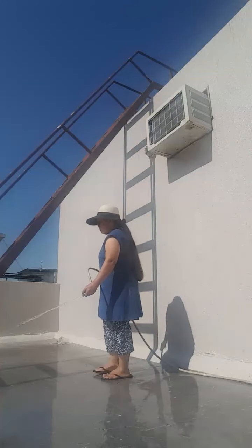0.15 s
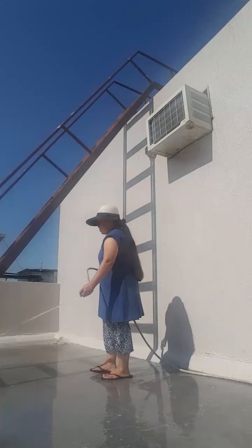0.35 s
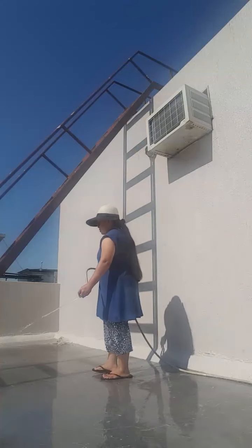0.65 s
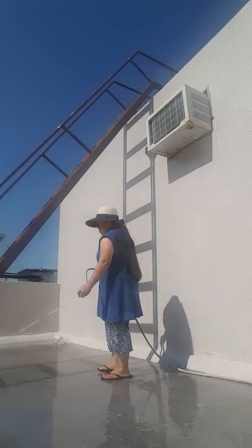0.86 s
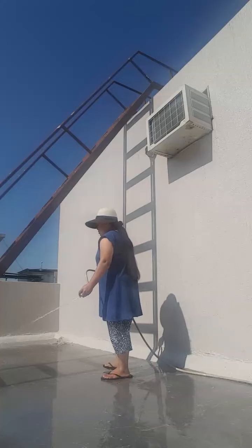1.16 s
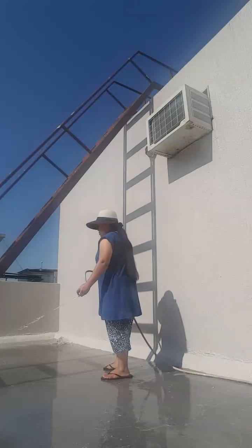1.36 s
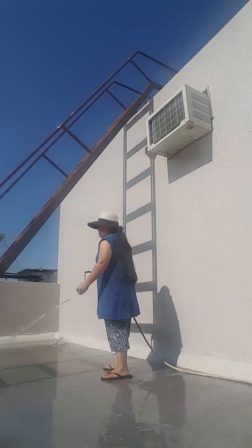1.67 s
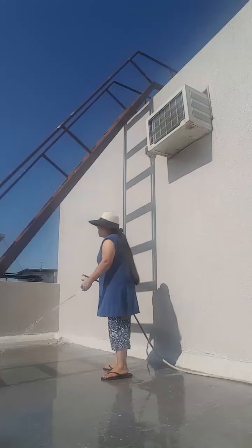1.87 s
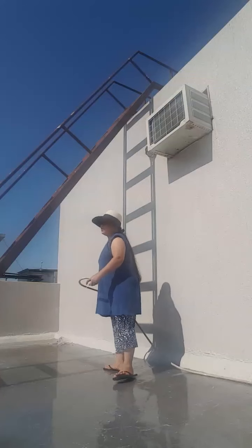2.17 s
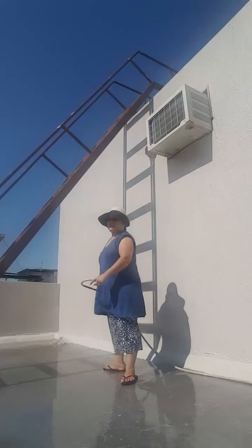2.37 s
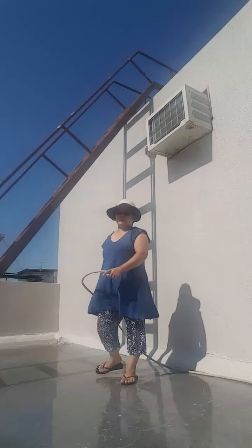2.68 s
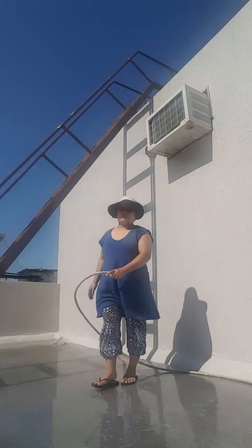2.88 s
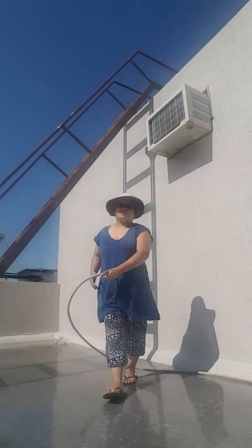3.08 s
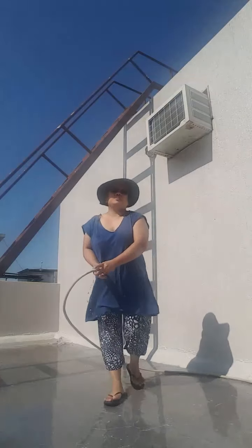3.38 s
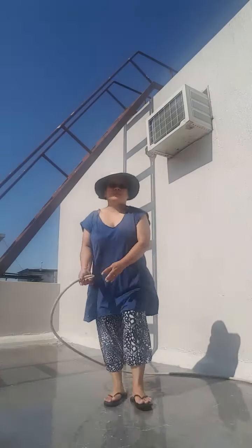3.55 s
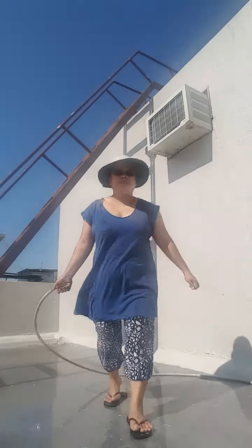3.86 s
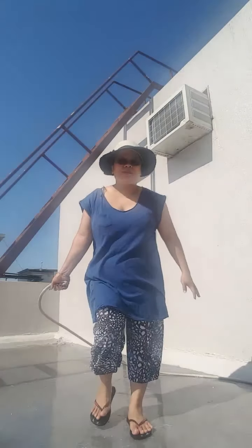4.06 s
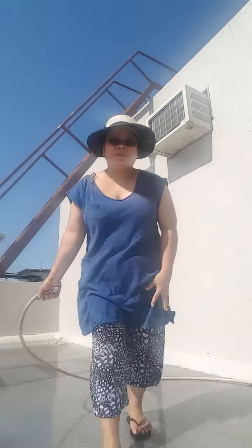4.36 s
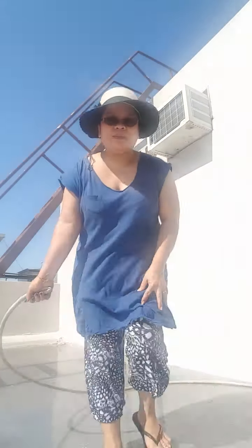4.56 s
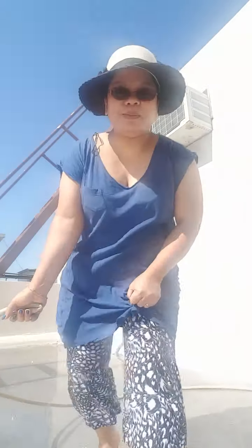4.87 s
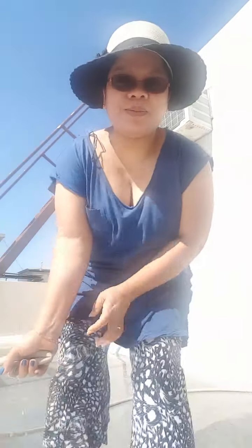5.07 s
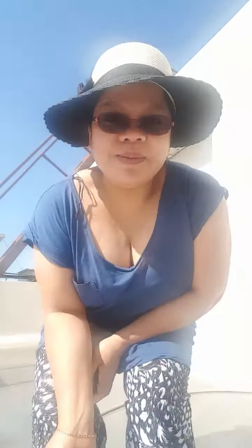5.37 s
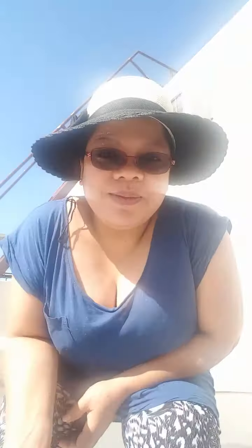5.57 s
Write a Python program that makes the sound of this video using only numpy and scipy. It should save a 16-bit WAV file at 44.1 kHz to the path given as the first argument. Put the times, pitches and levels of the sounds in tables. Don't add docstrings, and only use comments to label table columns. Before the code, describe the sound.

On an open concrete roof terrace, a hose sprays the floor with bright, fizzing splatter for about two seconds, then cuts off to a few drips. A steady low compressor hum and fan roar continue throughout. Sparrows chirp with hard wall echoes. Wet sandals smack, knock and scuff irregularly, approaching a phone microphone, with small ticks and a long scrape near the end. Soft wind bumps hit the microphone early on.

```python
import sys
import numpy as np
from scipy import signal
from scipy.fft import rfft, irfft, next_fast_len
from scipy.io import wavfile
from scipy.ndimage import uniform_filter1d

SR = 44100
rng = np.random.default_rng(int(sys.argv[2]) if len(sys.argv) > 2 else 0)


def generate_wav(signal):
    frames = np.transpose(np.atleast_2d(signal))
    scaled = np.clip(frames, -1, 1) * 32767
    pcm = np.round(scaled).astype(np.int16)
    wavfile.write(sys.argv[1], SR, pcm)


def invert_db(x):
    u = np.asarray(x, float) / 20
    return 10 ** u


N = 252693

# time in seconds, level in dB.
SPRAY_LEVEL = [
    (0, -33.5),
    (.2, -37.5),
    (.8, -36.5),
    (1.15, -38.5),
    (1.55, -36.5),
    (1.98, -37.5),
    (2.14, -44),
    (2.2, -53.5),
    (2.5, -80),
]
# frequency in Hz, level in dB per Hz.
SPLASH_TONE = [(880, -27.5), (1500, -7), (1640, -9), (2090, -3.5), (2610, -13), (3050, -7), (3600, -13),
               (4550, -7.5), (5800, -8.5), (6520, -6.5), (7180, -10), (8390, -5), (10600, -13),
               (12900, -11.5), (15300, -21.5)]
# frequency in Hz, width in Hz, change in dB.
FLOOR_DIPS = [(11980, 160, -9), (13200, 180, -8)]
# start in seconds, peak in dB.
BIG_DROPS = [(0.026, -22), (0.178, -19), (0.228, -27), (0.5287, -23), (0.5716, -20), (0.6642, -24),
             (0.7365, -15), (0.9592, -24.5), (1.1233, -20.5), (1.268, -20.5), (1.331, -18), (1.369, -18.5),
             (1.5424, -20), (1.8282, -28), (2.076, -23.5)]
# start in seconds, peak in dB.
DRIPS = [
    (2.253, -53),
    (2.268, -49),
    (2.400, -52),
    (2.449, -56),
    (2.468, -51),
    (2.496, -52),
    (2.535, -47),
    (2.552, -56),
    (3.19, -55),
    (4.155, -45.5),
]
# start in seconds, peak in dB.
STRAP_TICKS = [
    (3.700, -37.5),
    (3.750, -48),
    (3.834, -32.5),
    (4.210, -35),
    (4.717, -42),
    (4.740, -43.5),
    (4.765, -47),
]
# start in seconds, peak in dB, centre in Hz, length in ms.
SOLE_SLAPS = [(3.142, -42, 11000, 1.6), (3.150, -37.5, 5860, 1.7), (3.582, -35, 10000, 2.3),
              (3.624, -40, 9100, 1.2), (3.643, -41, 3000, 3.3), (3.792, -45, 8000, 5.7),
              (3.826, -45, 10900, 3.5), (3.955, -37.5, 1900, 4), (4.219, -45.5, 5000, 4.5),
              (4.323, -52.5, 6000, 2.5), (4.473, -48.5, 5000, 2.5), (4.705, -47, 4000, 1.5),
              (4.760, -38, 3000, 1.3), (4.835, -39.5, 2950, 2.5), (4.925, -47.5, 7000, 3),
              (5.121, -51, 4000, 2), (5.180, -43, 7000, 4.5), (5.188, -50, 9000, 3), (4.711, -49, 7000, 2),
              (4.772, -49, 5500, 2)]
# start in seconds, peak in dB, centre in Hz, length in ms.
HEEL_KNOCKS = [
    (3.612, -34, 3350, 2.9),
    (3.614, -39, 1900, 2.5),
    (3.819, -35.5, 3400, 1.6),
    (4.208, -33, 2160, 3.8),
    (4.584, -45, 2700, 3.6),
    (4.72, -33.5, 2830, 4),
    (4.733, -48.5, 2800, 2.2),
    (4.742, -47.5, 1800, 1.5),
    (4.751, -36.5, 1920, 3.2),
    (5.429, -32, 2050, 2.6),
]
# start in seconds, length in seconds, level in dB,
# centre in Hz, spread in octaves.
SCUFFS = [
    (3.232, .095, -50.5, 14500, .5),
    (3.234, 0.069, -45, 5970, 1.1),
    (3.579, 0.068, -51.5, 10900, 1.2),
    (4.702, .03, -46.5, 2780, 0.44),
    (4.704, 0.072, -51, 4500, 1.0),
    (5.199, 0.23, -48, 1500, 0.31),
    (4.92, .05, -63, 12900, .5),
    (5.13, 0.15, -56, 5500, 0.41),
    (5.241, .07, -53, 5950, 0.28),
    (5.624, .11, -64, 14500, .2),
]
# time in seconds, pitch in Hz, level in dB.
SQUEAK = [
    (5.12, 15160, -80),
    (5.14, 15200, -68),
    (5.2, 14300, -71),
    (5.225, 15250, -68.5),
    (5.3, 15400, -66),
    (5.335, 14900, -65.5),
    (5.4, 13400, -74),
]
# share of its length, pitch in Hz, level in dB.
FALLING_SHAPE = [(0, 4760, -8.5), (.11, 5096, -0.5), (.24, 5005, -7), (.37, 4710, -6), (.72, 4060, 0),
                 (.87, 4010, -5.5), (1, 3330, -6)]
# start in seconds, length in seconds, level in dB,
# upward flick before the last drop in Hz, flutter from 0 to 1.
FALLING_CHIRPS = [
    (1.688, .066, -39.5, -80, 0.9),
    (2.129, .06, -39.5, 600, 0.6),
    (2.677, 0.049, -40.5, -150, 0.2),
    (3.345, .059, -38, 750, 0.16),
    (4.050, 0.062, -37, 700, 0.2),
    (5.574, .054, -35, 650, .3),
]
# start in seconds, length in seconds, level in dB,
# starting pitch in Hz, top pitch in Hz.
ARCHED_CHIRPS = [
    (1.756, .032, -39.5, 3500, 3750),
    (2.182, 0.04, -38, 3340, 3850),
    (2.744, .042, -38, 3600, 4130),
    (3.400, .047, -38.5, 3010, 3820),
    (4.104, .044, -38, 2960, 3760),
    (5.626, .044, -37.5, 3130, 3810),
    (2.716, .035, -48, 4830, 5280),
    (3.171, 0.077, -45, 3470, 3540),
    (5.668, .056, -48, 4550, 4500),
]
# start in seconds, length in seconds, level in dB,
# starting pitch in Hz, top pitch in Hz.
PEEPS = [
    (2.003, .045, -48, 2750, 3030),
    (2.062, .028, -50, 2930, 3100),
    (5.470, .075, -55, 3000, 3250),
    (2.782, .018, -46, 4150, 4300),
    (2.719, .024, -41, 3500, 3700),
    (3.350, .022, -50, 5750, 5950),
    (4.056, .022, -56, 5750, 5950),
    (5.577, .022, -54, 5500, 5900),
    (2.738, .018, -56, 5850, 6000),
]
# delay in seconds, level in dB.
WALL_ECHOES = [
    (.007, -7.5),
    (0.032, -17.5),
    (.058, -21),
    (.099, -18.5),
]
# time in seconds, level at the stroke rate in dB, level at twice that rate in dB.
DRONE_LEVELS = [(0.0, -36, -23), (0.09, -28.5, -21), (0.54, -26.5, -21.5), (0.65, -31, -22),
                (0.83, -26, -21), (1.32, -26, -21), (1.74, -32, -21.5), (1.79, -25, -20.5),
                (2.06, -25, -20.5), (2.7, -30.5, -22.5), (3.22, -24.5, -22), (3.69, -30, -20.5),
                (3.83, -25.5, -20.5), (4.6, -27.5, -23), (4.66, -29.5, -21.5), (5.47, -25.5, -19.5),
                (5.68, -27, -17.5), (5.73, -36, -18)]
# multiple of the stroke rate, level in dB.
DRONE_OVERTONES = [(3, -43), (4, -50.5), (13, -51.5), (14, -56), (22, -62.5)]
# frequency in Hz, level in dB per Hz.
ROAR_TONE = [(12, -66.5), (20, -33), (42, -16.5), (86, -10.5), (141, -5), (195, -11.5), (220, -11),
             (247, -10.5), (663, -15), (764, -12.5), (1060, -18.5), (1250, -17.5), (1550, -32.5),
             (2100, -33), (5500, -66), (7150, -84), (12100, -120)]
# frequency in Hz, width in Hz, level in dB.
HOUSING_WHISTLES = [(48.4, 12, -53), (120.6, 14, -39.5), (141, 8, -43), (236.9, 7.9, -45.5),
                    (478, 30, -47.5), (572.3, 29, -46.5), (1214, 17, -53.5),
                    (761, 14, -44.5), (922, 8, -46.5)]
# centre in seconds, length in seconds, pitch in Hz, level in dB.
GUSTS = [
    (1.348, .009, 85, -22),
    (1.63, .012, 130, -20.5),
    (1.66, 0.012, 90, -15.5),
    (1.715, 0.034, 78.5, -31),
    (1.858, 0.02, 135, -19.5),
    (1.872, 0.011, 70, -26),
    (2.25, .02, 70, -33),
]
# frequency in Hz, level in dB per Hz.
HISS_TONE = [(1470, -14), (2500, -5), (3000, 0.5), (3400, -8), (3970, -1), (4840, -8), (5800, -9.5),
             (7600, -11.5), (8600, -10.5), (9500, -15.5), (10400, -21.5), (12300, -18.5), (15300, -21),
             (16500, -44.5)]
# time in seconds, level in dB.
RUNOFF_LEVEL = [
    (2.3, -59),
    (2.9, -59.5),
    (3.73, -56.5),
    (4.29, -57),
    (5.16, -56),
    (5.73, -57),
]
# frequency in Hz, width in Hz, change in dB.
CASE_RIPPLE = [(1986, 103, 5), (8480, 280, 2.5), (8280, 110, 0.5), (10400, 390, -3), (14350, 200, 0)]


def evened(x):
    return x / np.sqrt(np.mean(x ** 2) + 1e-20)


def read(points, hz):
    f, value = np.transpose(points)
    return np.interp(np.log(hz + 1), np.log(f + 1), value)


def follow(rows, t):
    s, *columns = np.transpose(rows)
    return [np.interp(t, s, column) for column in columns]


def add(mix, s, sound):
    part = mix[round(s * SR):][:len(sound)]
    part += sound[:len(part)]


def drift(hz):
    size = next_fast_len(N, True)
    spectrum = rfft(rng.standard_normal(size))
    slow = spectrum / (1 + (np.fft.rfftfreq(size, 1 / SR) / hz) ** 4)
    return evened(irfft(slow, size)[:N])


def colour(x, db_of, size=1024):
    hz, t, z = signal.stft(x, SR, nperseg=size, noverlap=size * 3 // 4)
    z = z * invert_db(db_of(hz[:, None], t))
    return signal.istft(z, SR, nperseg=size, noverlap=size * 3 // 4)[1][:len(x)]


def octaves(hz):
    return np.log2((hz + 1) / 8500)


def ripple(hz, dips):
    return sum(db * np.exp(-.5 * ((hz - f) / width) ** 2) for f, width, db in dips)


def bump(hz, centre_hz, spread):
    away = np.abs(np.log2((hz + 1) / centre_hz))
    return np.maximum(-6 * (away / spread) ** 2, -14 - 10 * away)


def burst(envelope, centre_hz, spread, grain_db):
    def shape(hz, t):
        opening = 0.47 * read(SPLASH_TONE, np.maximum(hz, 1700))
        return opening + bump(hz, centre_hz, spread) + ripple(hz, FLOOR_DIPS) + 0 * t

    padded = np.pad(envelope, 512)
    grains = rng.standard_normal(len(padded) // 40 + 1).repeat(40)[:len(padded)]
    noise = rng.standard_normal(len(padded)) * invert_db(grain_db * grains)
    puff = (colour(noise, shape, size=256) * padded)[512:-512]
    return evened(puff) * np.sqrt(np.mean(envelope ** 2))


BRIGHT_TILT, DULL_TILT = 4, 2


def dullness(t):
    away = ((t - 0.32) / 0.69 + .5) % 1 - .5
    return BRIGHT_TILT + (DULL_TILT - BRIGHT_TILT) * np.exp(-(away / 0.13) ** 2)


def water():
    size = invert_db(3.6 * np.minimum(rng.exponential(1, N), 4.5)) * rng.choice([-1, 1], N)
    clumps = invert_db(1.3 * drift(25))
    drops = size * (rng.random(N) < 3500 * clumps / SR)
    kind = rng.integers(0, 24, N)
    fizz = np.zeros(N)
    for k, hz in enumerate(np.geomspace(2500, 14000, 24)):
        u = np.arange(round(8 * SR / hz)) * hz / SR
        bubble = np.sin(2 * np.pi * u * (1 + 0.018 * u)) * u * np.exp(-u)
        fizz += signal.oaconvolve(drops * (kind == k), bubble)[:N]
    fizz = colour(fizz, lambda hz, t: 4 * np.clip(octaves(hz), -2, 1) + 0 * t, size=256)
    wash = clumps ** 0.19 * rng.standard_normal(N)
    wet = 0.66 * evened(fizz) + 0.73 * wash

    def shape(hz, t):
        tilt = dullness(t) * np.clip(octaves(hz), -2, 1)
        return read(SPLASH_TONE, hz) + ripple(hz, FLOOR_DIPS) + tilt

    wet = colour(wet, shape, size=512)
    t = np.arange(N) / SR
    level_db = follow(SPRAY_LEVEL, t)[0] + 0.81 * drift(7.1)
    level_db += 0.33 * (BRIGHT_TILT - dullness(t))
    return invert_db(level_db) * wet / np.sqrt(np.mean(wet[:SR] ** 2))


def big_drops():
    out, ms = np.zeros(N), np.arange(SR // 50) / SR * 1000
    envelope = np.minimum(ms / 0.61, 1) * np.exp(-ms / 1.83)
    for s, db in BIG_DROPS:
        add(out, s, invert_db(db - 4.5) * burst(envelope, 8800, spread=0.59, grain_db=1.5))
    return out


def smacks():
    out, ms = np.zeros(N), np.arange(SR // 20) / SR * 1000
    hits = [(s, db, 12600, .8, 0.56) for s, db in DRIPS]
    hits += [(s, db, 5440, 1.7, 0.47) for s, db in STRAP_TICKS]
    hits += [(*row, 1.1) for row in SOLE_SLAPS]
    hits += [(*row, 0.57) for row in HEEL_KNOCKS]
    for s, db, hz, length, spread in hits:
        u = ms / length
        fade = 1.9 * np.exp(-u ** 0.95) + .08 * np.exp(-ms / 12)
        add(out, s, invert_db(db) * burst(np.minimum(u / 0.36, 1) * fade, hz, spread, grain_db=0))
    return out


def heel_hollow():
    out, ms = np.zeros(N), np.arange(SR // 20) / SR * 1000
    for s, db, hz, length in HEEL_KNOCKS:
        u = ms / (1.3 * length)
        envelope = 2 * np.e * u * np.exp(-2 * u)
        add(out, s, invert_db(db - 5) * envelope * np.sin(2 * np.pi * hz * ms / 1000))
    return out


def scuffs():
    out = np.zeros(N)
    for s, length, db, hz, spread in SCUFFS:
        envelope = signal.windows.tukey(round(length * SR), .3)
        add(out, s, invert_db(db) * burst(envelope, hz, spread, grain_db=3.1))
    return out


def squeak():
    out = np.zeros(N)
    t = np.arange(SQUEAK[0][0], SQUEAK[-1][0], 1 / SR)
    hz, db = follow(SQUEAK, t)
    wobble = drift(220)[:len(t)] + 1j * drift(220)[:len(t)]
    whistle = (wobble * np.exp(2j * np.pi * np.cumsum(hz) / SR)).real
    add(out, t[0], invert_db(db + 3.5 * drift(30)[:len(t)]) * whistle)
    return out


def compressor():
    t = np.arange(N) / SR
    first_db, second_db = uniform_filter1d(follow(DRONE_LEVELS, t), size=1500)
    first_db = first_db + 1.32 * drift(5)
    second_db = second_db + 0.81 * drift(11)
    turn = 2 * np.pi * 97.07 * t
    out = invert_db(first_db) * np.sin(turn + 0.24 * drift(1.9) + 2.23)
    out += invert_db(second_db) * np.sin(2 * turn + 0.049 * drift(3.6) + 1.58)
    for k, db in DRONE_OVERTONES:
        out += invert_db(db + 2.33 * drift(4.3)) * np.sin(k * turn + 0.21 * drift(1))
    return np.sqrt(2) * out


def fan():
    roar = colour(rng.standard_normal(N), lambda hz, t: read(ROAR_TONE, hz) + 0 * t, size=4096)
    t = np.arange(N) / SR
    out = invert_db(-32.5 + 0.5 * drift(20)) * evened(roar)
    for hz, width, db in HOUSING_WHISTLES:
        turn = 2 * np.pi * hz * t
        out += invert_db(db) * (drift(width / 2) * np.cos(turn) + drift(width / 2) * np.sin(turn))
    return out


def arch(start_hz, top_hz, droop):
    end_hz = top_hz * (1 - droop)
    return [(0, start_hz, -7), (.2, start_hz, -1.5), (.47, top_hz, -2), (.63, top_hz, 1),
            (.85, end_hz, -1.5), (1, end_hz, -7)]


def chirp(shape, length, rough):
    t = np.arange(0, length, 1 / SR)
    hz, db = follow(shape, t / length)
    turn = 2 * np.pi * np.cumsum(uniform_filter1d(hz, 90)) / SR
    wander = uniform_filter1d(uniform_filter1d(rng.standard_normal(len(t)), 70), 70)
    flutter = 1 + rough * evened(wander)
    return np.sqrt(2) * flutter * invert_db(db) * np.sin(turn) * signal.windows.tukey(len(t), .06)


def sparrows():
    calls = np.zeros(N)
    *fall, (share, hz, turn_db), drop = FALLING_SHAPE
    for s, length, db, flick, rough in FALLING_CHIRPS:
        shape = fall + [(share, hz + flick, turn_db), drop]
        add(calls, s, invert_db(db) * chirp(shape, length, rough))
    for rows, droop, rough in ((ARCHED_CHIRPS, .125, .3), (PEEPS, .03, .6)):
        for s, length, db, start_hz, top_hz in rows:
            add(calls, s, invert_db(db) * chirp(arch(start_hz, top_hz, droop), length, rough))
    t = np.arange(SR // 2) / SR
    tail = rng.standard_normal(len(t)) * invert_db(-60 * t / .8) * np.minimum(t / 0.011, 1)
    space = invert_db(-9) * tail / np.linalg.norm(tail)
    for s, db in WALL_ECHOES:
        add(space, s, invert_db([db]))
    return calls + signal.oaconvolve(calls, space)[:N]


def gusts():
    out = np.zeros(N)
    for s, length, hz, db in GUSTS:
        u = np.arange(-2 * length, 2 * length, 1 / SR) / length
        swing = np.cos(2 * np.pi * hz * length * u * (1 - 0.12 * u))
        add(out, s - 2 * length, invert_db(db) * np.exp(-2 * u ** 2) * swing)
    return out


def runoff():
    def shape(hz, t):
        level_db = follow(RUNOFF_LEVEL, t)[0]
        top_db = .8 * np.interp(t * SR, np.arange(N), drift(6))
        top = np.clip((hz - 9600) / 800, 0, 1)
        patches = rng.standard_normal((len(hz), len(t)))
        patches = evened(uniform_filter1d(uniform_filter1d(patches, 9, 0), 14, 1))
        change = (1 - .4 * top) * (level_db - level_db.mean())
        return read(HISS_TONE, hz) + change + top * top_db + 1.6 * patches

    return invert_db(-52.5) * evened(colour(rng.standard_normal(N), shape, size=512))


def scene():
    spray = water() + big_drops()
    steps = smacks() + heel_hollow() + scuffs() + squeak()
    machine = compressor() + fan()
    return (spray + steps + machine + sparrows() + gusts() + runoff())[None]


def low_pass(x):
    return signal.sosfilt(signal.butter(12, 15490, fs=SR, output="sos"), x)


def record(dry):
    size = next_fast_len(N, True)
    hz = np.fft.rfftfreq(size, 1 / SR)
    mix = irfft(rfft(dry, size) * invert_db(ripple(hz, CASE_RIPPLE)), size)[:, :N]
    return low_pass(mix)


dry = scene()
out = record(dry)
generate_wav(out)
```